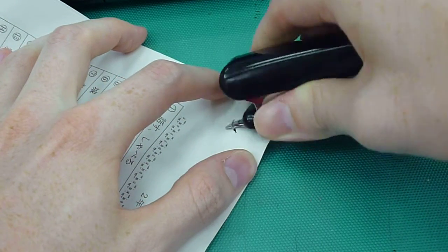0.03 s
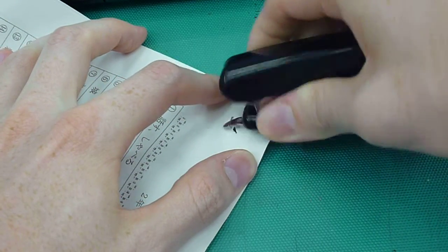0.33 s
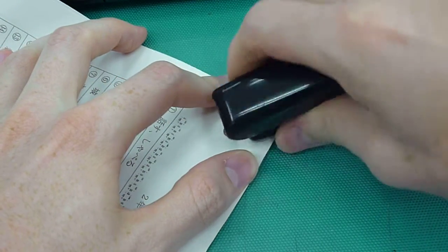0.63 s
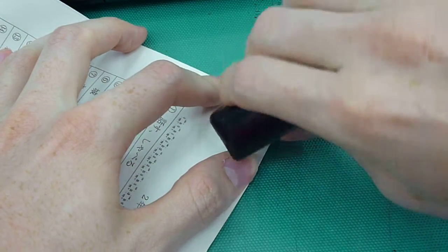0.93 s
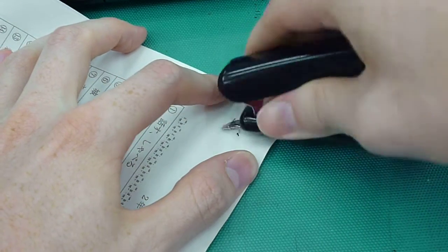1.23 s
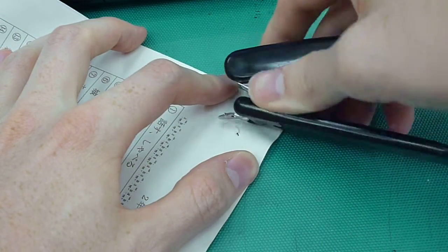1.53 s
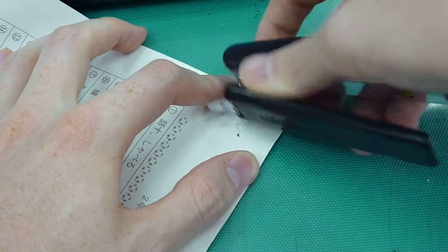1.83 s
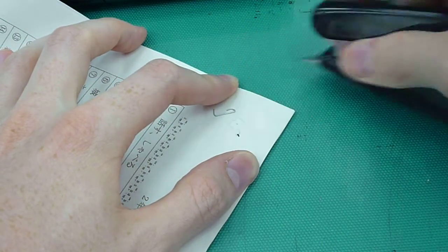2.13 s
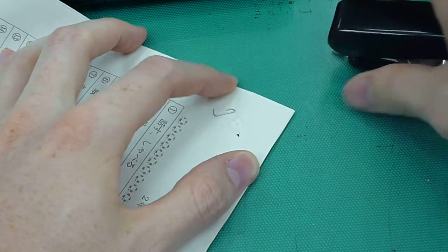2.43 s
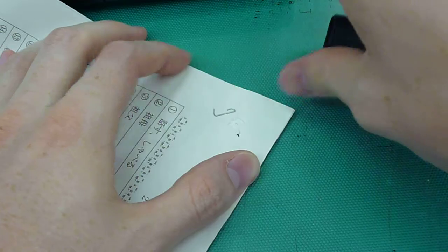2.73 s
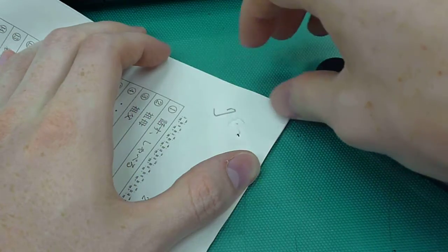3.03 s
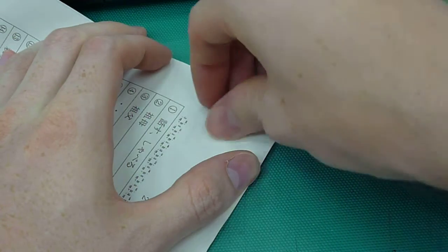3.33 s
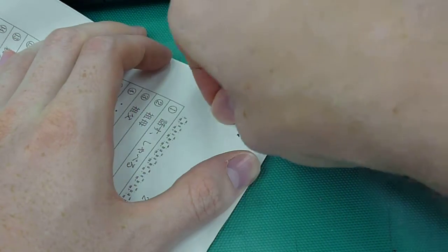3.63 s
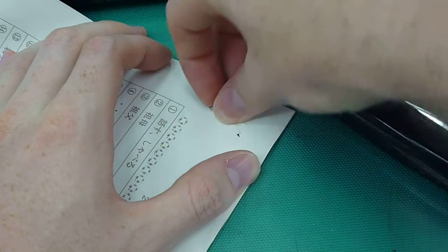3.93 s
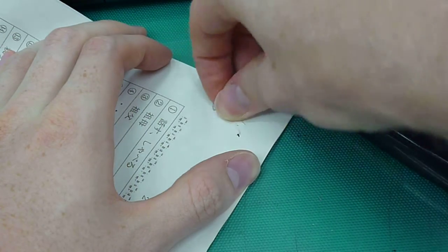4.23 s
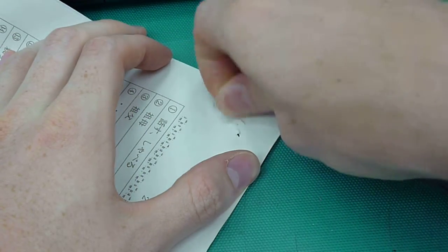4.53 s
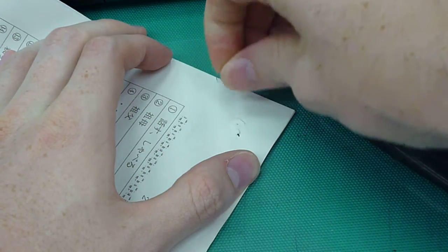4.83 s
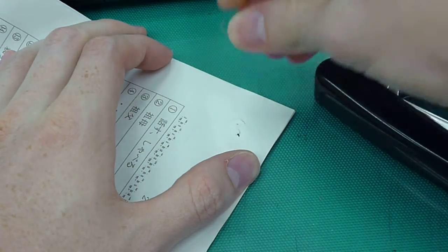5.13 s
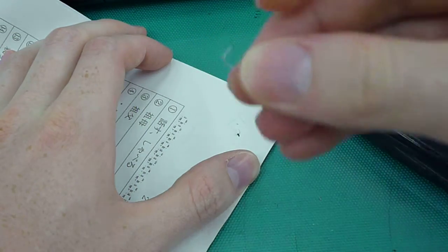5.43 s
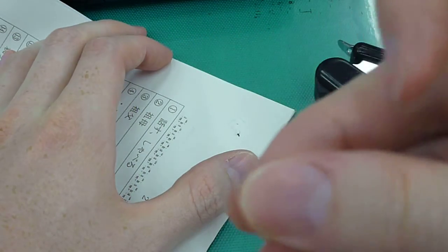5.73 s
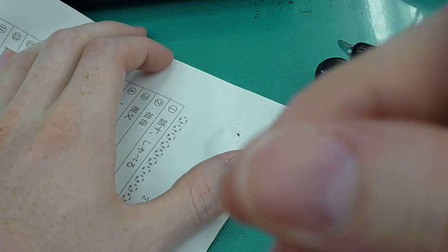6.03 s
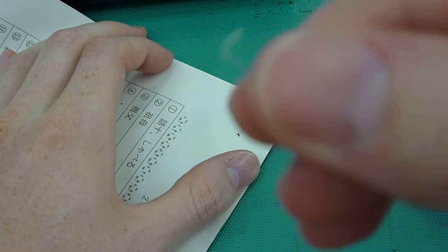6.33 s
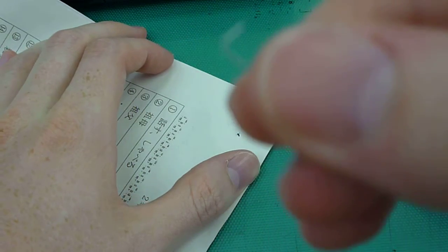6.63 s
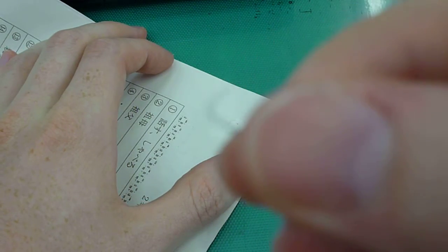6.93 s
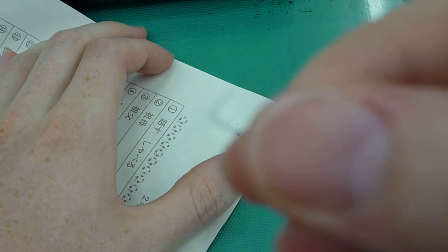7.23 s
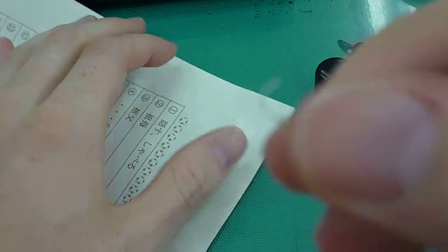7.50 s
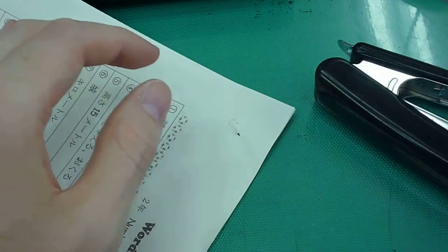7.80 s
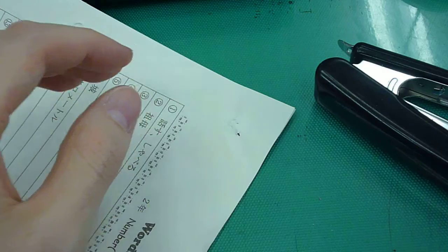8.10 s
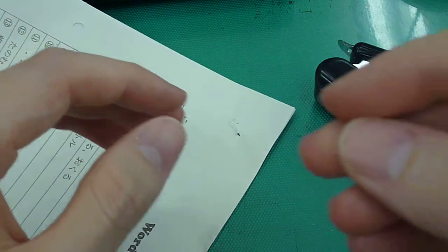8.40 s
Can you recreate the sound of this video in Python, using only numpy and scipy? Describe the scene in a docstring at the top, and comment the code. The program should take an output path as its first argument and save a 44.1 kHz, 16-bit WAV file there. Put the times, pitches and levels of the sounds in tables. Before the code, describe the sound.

A stapler pries a staple from paper with sharp clicks and is set down with a clack, over a steady fan.

```python
"""At a desk, in a room with a fan running. A stapler's claw pries a staple out of a paper stack on a
rubber mat; the stapler is then set down with a clack. Each contact is a steel tick, a ring of the
plastic shell and a hollow knock of the base; heavier blows boom in the desk. Fingers then rub the paper
and pick up the staple. A small narrow-band camera microphone with notches and gain control hears it."""
import sys
import numpy as np
from scipy import signal
from scipy.fft import rfft, irfft
from scipy.io import wavfile

SR = 44100
rng = np.random.default_rng(int(sys.argv[2]) if len(sys.argv) > 2 else 0)


def unload_wav(signal):
    """Save mono or channel-first audio to the path in sys.argv[1] as 16-bit WAV at rate SR, clipped to [-1, 1]."""
    wavfile.write(
        sys.argv[1],
        SR,
        np.round(np.clip(np.atleast_2d(signal).T, -1, 1) * 32767).astype(np.int16),
    )


N = 381906

# Fan air and microphone hiss. Each row: frequency in Hz, relative density in dB.
AIR_SPECTRUM = [(25, -17.5), (70, -8.5), (150, 0), (260, 2), (430, 0.5), (620, -3), (880, -2), (1150, -4.5),
                (1900, -13), (3000, -13), (3900, -16.5), (5000, -15.5), (6300, -18), (8500, -27)]
# Mains hum and fan whine. Each row: frequency in Hz, rms level in dB, waver in Hz.
FAN_TONES = [(59.7, -68, .1), (119.5, -56.5, 0.13), (481.4, -59, 1.16), (787, -51, 2.84),
             (3438, -69.5, 2.5)]
# Fingers and claw on paper. Each row: start in seconds, length in seconds, level in dB, centre in Hz.
PAPER_RUBS = [(0, .25, -52.5, 5740), (0.688, 0.29, -52, 6300), (3.304, 0.1, -52, 5440),
              (3.722, 0.15, -52, 5230), (4.23, .088, -50, 2100), (4.792, .044, -51, 2700),
              (5.353, .06, -55, 1980), (5.526, 0.08, -47, 5000), (5.538, .11, -51.5, 3220),
              (6.983, .1, -55, 2600), (8.389, 0.2, -51, 2654), (8.43, .1, -40.5, 1170)]
# Claw, staple and fingernails. Each row: start in seconds, level in dB, pitch in Hz.
LIGHT_TICKS = [(.1266, -34.5, 5500), (.2034, -39.5, 6000), (1.8452, -47, 5900), (1.8871, -40.5, 5000),
               (4.811, -39, 700), (5.367, -41, 1940), (7.014, -44, 2300), (7.4572, -35.5, 5960),
               (7.6677, -44.5, 5340), (8.567, -40, 1765)]
# The claw slides under, levers, tears the staple free; the stapler rattles, is set down, settles.
# Each row: start in seconds, relative levels of base knock, shell ring and steel tick in dB,
# tick pitch in Hz.
STAPLER_CONTACTS = [(0.3622, -33.5, -47, -32, 5800), (0.4278, -40, -58, -41, 4900),
                    (0.4484, -46, -43, -22, 5150), (0.454, -39.5, -51, -50, 5100),
                    (1.0398, -47, -45, -43.5, 4200), (1.0853, -27, -45, -33.5, 4660),
                    (1.7299, -39, -35, -28, 6760), (1.7342, -33.5, -41, -28, 5460),
                    (1.7373, -46, -32, -25, 6500), (1.7378, -52, -32.5, -35, 5200),
                    (2.0431, -29, -42, -38, 5900), (2.0475, -47, -30.5, -29, 5100),
                    (2.1304, -52, -39.5, -44, 3680), (2.1956, -60, -40, -34, 4400),
                    (2.3441, -34, -44, -40, 4500), (2.4918, -58, -38.5, -66, 4700),
                    (2.4988, -56, -43, -60, 4700), (2.8143, -37, -42, -37, 5000),
                    (2.8183, -22.5, -29, -19.5, 4050), (2.8569, -48, -31.5, -25, 4600),
                    (2.8762, -34, -44, -41, 5100), (2.9556, -39, -60, -59, 4750)]
# Modes of shell, base, metal rail and desk. Each row: frequency in Hz, relative level in dB,
# t60 in seconds.
SHELL_MODES = [(1980, -1, 0.024), (2525, 0, 0.015), (2807, 3.5, 0.015), (3035, -2, .016), (4030, 6, 0.0097),
               (5220, 3, 0.018)]
BASE_MODES = [(700, -14.5, 0.008), (910, -5.5, 0.021), (1050.6, 12, 0.019), (1210, 0, 0.03)]
RAIL_MODES = [(1080, 1, 0.1), (2500, -8, 0.23), (2920, -15, .15), (5290, -10, 0.16)]
DESK_MODES = [(83, -9.5, 0.55), (121, 3, 0.2), (162, -4, 0.26), (200, -6, 0.76), (238.4, 0.5, 0.2),
              (273, 13, 0.058), (335, -9.5, 0.039)]
# Blows reaching the desk through the mat. Each row: start in seconds, relative level in dB.
DESK_BLOWS = [(.453, -34), (1.086, -33), (1.733, -40), (2.047, -44.5), (2.344, -33.5), (2.817, -28),
              (2.855, -38), (2.878, -44), (2.917, -36)]
# Hand on the mat. Each row: start in seconds, level in dB.
HAND_BUMPS = [(4.245, -37.5), (4.812, -43), (5.365, -35.5), (5.92, -40.5)]
# Microphone notches. Each row: centre in Hz, width in Hz.
MIC_NOTCHES = [(1400, 531), (1599, 529), (2153, 138.5), (8000, 598.5)]
# Microphone treble roll-off. Each row: frequency in Hz, gain in dB.
MIC_TREBLE = [(6200, 0), (7000, -2.5), (7600, -7), (8300, -14), (8800, -24.5), (9300, -53.5)]

LET_GO_S, SETTLED_S = 2.8, 3.0


def amp(db):
    """Decibels to gain."""
    return 10 ** (np.asarray(db) / 20)


def unit_rms(x):
    """Scales to rms 1."""
    return x / np.sqrt(np.mean(x ** 2) + 1e-20)


def unit_hit(x):
    """Scales to the energy of 4 ms at rms 1."""
    return x * np.sqrt(.004 * SR / (np.sum(x ** 2) + 1e-20))


def add(mix, start_s, sound):
    """Mixes a sound in at start_s."""
    part = mix[max(round(start_s * SR), 0):][:len(sound)]
    part += sound[:len(part)]


def colour(x, points):
    """Filters by a spectrum of (Hz, dB) points."""
    hz, db = np.transpose(points)
    bins_hz = np.fft.rfftfreq(len(x), 1 / SR)
    gain_db = np.interp(np.log(bins_hz + 1), np.log(hz), db)
    return irfft(rfft(x) * amp(gain_db), len(x))


def band_pass(x, hz, width_hz):
    """Two equal broad resonances in series."""
    b, a = signal.iirpeak(hz, hz / width_hz, SR)
    return signal.lfilter(b, a, signal.lfilter(b, a, x))


def high_pass(x, hz):
    """A small body radiates little below its resonances."""
    return signal.sosfilt(signal.butter(2, hz, "high", fs=SR, output="sos"), x)


def drift(points_per_s):
    """Slow wander between unit-normal points."""
    points = rng.standard_normal(400)
    return np.interp(np.arange(N) / SR * points_per_s, np.arange(400), points)


def ring(modes, t, detune):
    """Decaying sines of a struck body, one detune ratio per mode."""
    return sum(amp(db - 60 * t / t60_s) * np.sin(2 * np.pi * hz * ratio * t)
               for (hz, db, t60_s), ratio in zip(modes, detune))


def in_set_down(time_s):
    """Whether a contact falls within the freely ringing set-down clack."""
    return LET_GO_S < time_s < SETTLED_S


def fan(air_db=-42, swell_db=0.4, flutter_db=1.17):
    """Steady rushing air with faint wavering hum and whine."""
    air_gain = amp(air_db + swell_db * drift(8.1))
    out = air_gain * unit_rms(colour(rng.standard_normal(N), AIR_SPECTRUM))
    for hz, db, waver_hz in FAN_TONES:
        cycles = np.cumsum(hz + waver_hz * drift(14)) / SR
        out += np.sqrt(2) * amp(db + flutter_db * drift(10)) * np.sin(2 * np.pi * cycles)
    return out


def paper_rubs(grains_per_s=3000, spread_db=3, width_ratio=0.81):
    """Fibres catch and let go in dense tiny grains under each stroke."""
    out = np.zeros(N)
    for start_s, length_s, db, hz in PAPER_RUBS:
        catches = rng.random(SR) < grains_per_s / SR
        sizes = amp(spread_db * np.minimum(rng.exponential(1, SR), 4))
        grains = rng.choice([-1, 1], SR) * catches * sizes
        rub = band_pass(grains[:int(length_s * SR)], hz, hz * width_ratio)
        add(out, start_s, amp(db) * unit_rms(rub) * signal.windows.tukey(len(rub), .7))
    return out


def tick(hz, t, snap_s, grit_share, grit_s=0.0011):
    """A hard edge slips free: a sharp snap and a brief gritty scrape."""
    snap = np.exp(-t / snap_s) * np.sin(2 * np.pi * hz * t)
    grit = band_pass(rng.standard_normal(len(t)), hz, width_hz=2700)
    scrape = unit_rms(grit) * np.exp(-t / grit_s)
    return unit_hit(high_pass(snap + grit_share * scrape, hz / 2))


def light_ticks(decay_cycles=2.1):
    """Touches too light to shake the stapler; each snap dies in a few cycles."""
    out, t = np.zeros(N), np.arange(2048) / SR
    for start_s, db, hz in LIGHT_TICKS:
        add(out, start_s, amp(db) * tick(hz, t, snap_s=decay_cycles / hz, grit_share=0.17))
    return out


def shell_ring(centre_hz, t, detune, slope_db_per_octave=19, rise_s=0.00024):
    """The plastic shell swells as the blow spreads; modes far from centre_hz are weaker."""
    modes = [(hz, db - slope_db_per_octave * abs(np.log2(hz / centre_hz)), t60_s)
             for hz, db, t60_s in SHELL_MODES]
    swell = 1 - np.exp(-t / rise_s)
    return unit_hit(high_pass(ring(modes, t, detune) * swell, hz=2050))


def stapler(knock_gain_db=5.5, shell_gain_db=3.0, rail_gain_db=-8, rebound_s=0.0041, rebound_db=-20):
    """Each contact rings shell, steel and base; loose parts then meet again faintly."""
    out, t = np.zeros(N), np.arange(8192) / SR
    for start_s, knock_db, shell_db, steel_db, tick_hz in STAPLER_CONTACTS:
        # Harder contacts tick higher and longer and reach higher shell modes.
        hardness = tick_hz / 5000
        centre_hz = 2690 * hardness ** 0.66
        # Each mode shifts slightly per contact.
        base_detune, shell_detune = 1 + 0.02 * rng.standard_normal((2, len(SHELL_MODES)))
        click = amp(shell_db + shell_gain_db) * shell_ring(centre_hz, t, shell_detune)
        click += amp(steel_db) * tick(tick_hz, t, snap_s=0.00012 * hardness ** 4, grit_share=0.13)
        knock = unit_hit(high_pass(ring(BASE_MODES, t, base_detune), hz=700))
        add(out, start_s, click + amp(knock_db + knock_gain_db) * knock)
        gap_s = rebound_s * (1 + 0.5 * rng.uniform(-1, 1))
        add(out, start_s + gap_s, amp(rebound_db) * click)
        if in_set_down(start_s):  # metal rail undamped
            rail = ring(RAIL_MODES, t, np.ones(len(RAIL_MODES)))
            add(out, start_s, amp(shell_db + rail_gain_db) * rail)
    return out


def desk_booms(rise_s=0.0027, gain_db=-4.5, held_decay_s=0.026):
    """The desk top booms, softened by the mat and cut short while the hand bears down."""
    out, t = np.zeros(N), np.arange(16384) / SR
    swell = 1 - np.exp(-t / rise_s)
    for start_s, db in DESK_BLOWS:
        detune = 1 + .008 * rng.standard_normal(len(DESK_MODES))
        damping = 1 if in_set_down(start_s) else np.exp(-t / held_decay_s)
        add(out, start_s, amp(db + gain_db) * ring(DESK_MODES, t, detune) * damping * swell)
    return out


def hand_bumps(decay_s=.022):
    """Flesh on the mat: a dull puff, no ring."""
    out, t = np.zeros(N), np.arange(8192) / SR
    for start_s, db in HAND_BUMPS:
        puff = band_pass(rng.standard_normal(len(t)), hz=420, width_hz=600)
        add(out, start_s, amp(db) * unit_rms(puff) * np.exp(-t / decay_s))
    return out


def room(x, far_db, far_t60_s, near_db=-16, near_t60_s=0.031):
    """Adds quick reflections off hands and desk, then the room's tail."""
    t = np.arange(SR // 2) / SR
    near, far = rng.standard_normal((2, len(t))) * (t > .002)
    near *= amp(-60 * t / near_t60_s)
    far *= amp(-60 * t / far_t60_s)
    echo = amp(near_db) * near / np.linalg.norm(near) + amp(far_db) * far / np.linalg.norm(far)
    return x + signal.fftconvolve(x, echo)[:N]


def gain_control(x, threshold_db=-25, duck_share=0.31, recover_db_per_s=4.5, lag_s=0.051):
    """Ducks after a loud clack, too slowly to catch the click itself, then recovers."""
    power_db = 10 * np.log10(signal.lfilter(np.ones(256) / 256, 1, x ** 2) + 1e-12)
    fall_db = np.arange(N) / SR * recover_db_per_s
    held_db = np.maximum.accumulate(power_db + fall_db) - fall_db
    over_db = np.maximum(held_db - threshold_db, 0)
    pole = np.exp(-1 / (lag_s * SR))
    return x * amp(-duck_share * signal.lfilter([1 - pole], [1, -pole], over_db))


def scene():
    """Close handling and the more reverberant desk boom, over the fan."""
    handling = stapler() + light_ticks() + paper_rubs() + hand_bumps()
    close = room(handling, far_db=-18, far_t60_s=0.41)
    boom = room(desk_booms(), far_db=-7, far_t60_s=0.96)
    return (close + boom + fan())[None]


def record(dry, edge_hz=9100, converter_bias=0.012):
    """Microphone chain: notches, treble roll-off, soft overload, gain control, bias, band limit."""
    x = dry[0]
    for hz, width_hz in MIC_NOTCHES:
        x = signal.lfilter(*signal.iirnotch(hz, hz / width_hz, SR), x)
    x = np.tanh(colour(x, MIC_TREBLE))
    x = gain_control(x) + converter_bias
    band_limit = signal.firwin(511, edge_hz, window=("kaiser", 9), fs=SR)
    return signal.oaconvolve(x, band_limit, "same")[None]


dry = scene()
out = record(dry)
unload_wav(out)
```